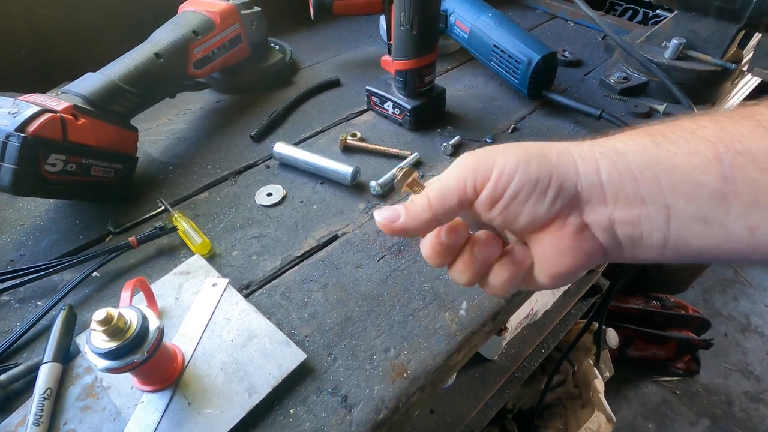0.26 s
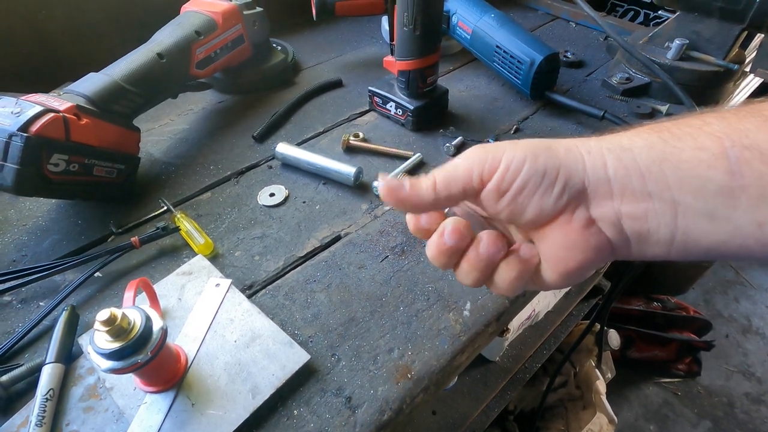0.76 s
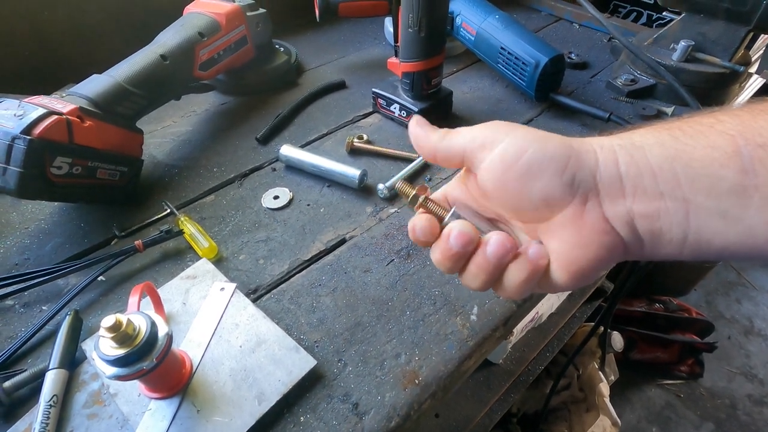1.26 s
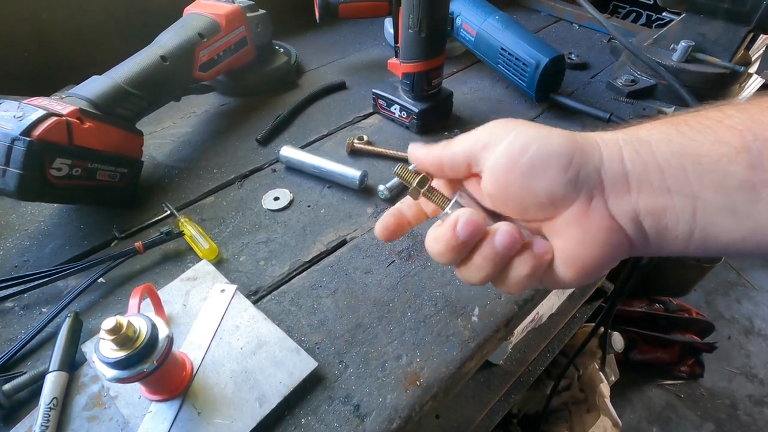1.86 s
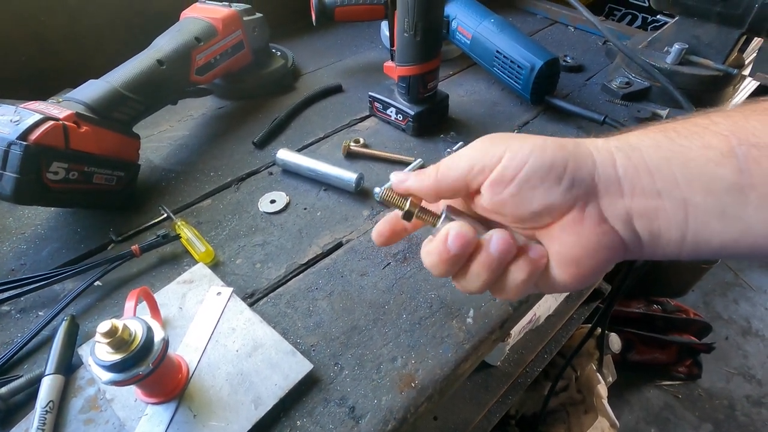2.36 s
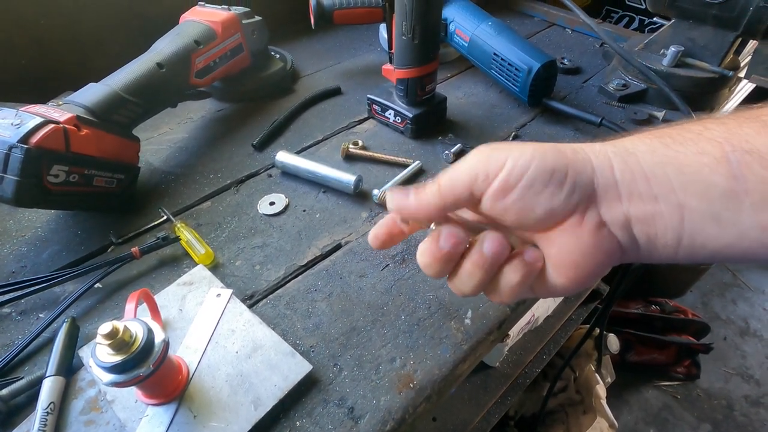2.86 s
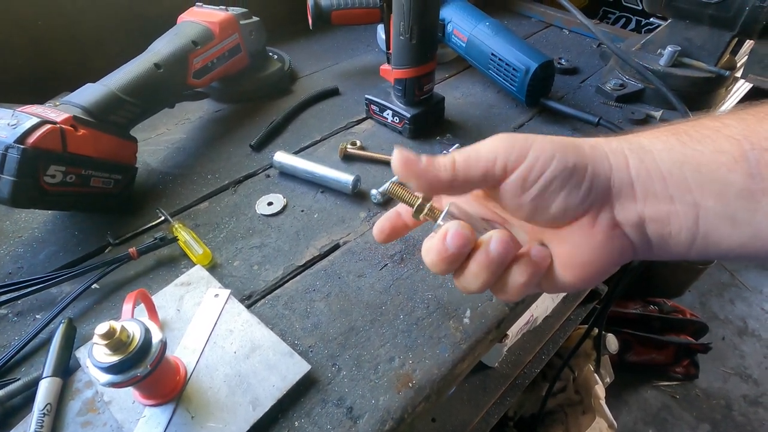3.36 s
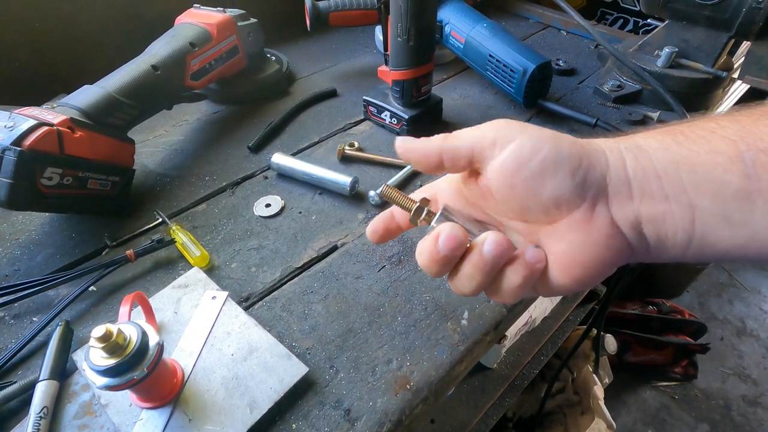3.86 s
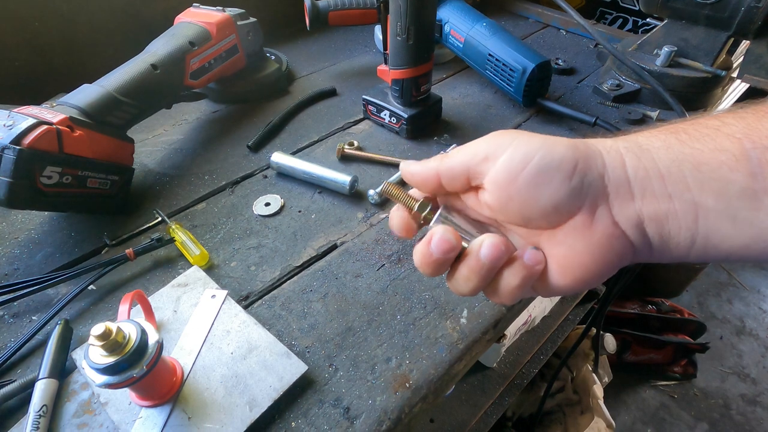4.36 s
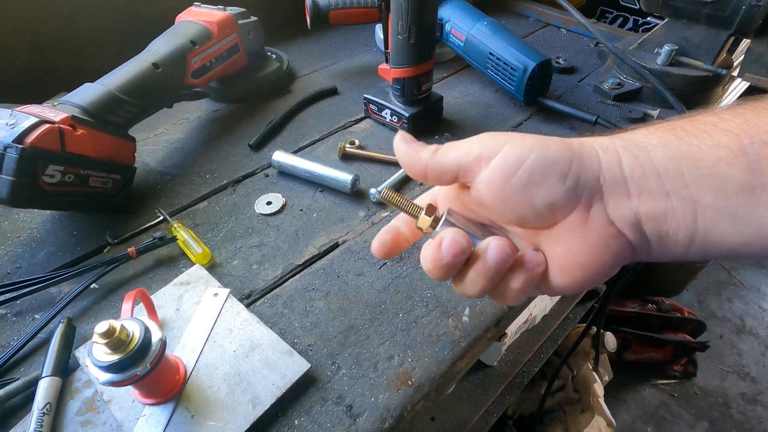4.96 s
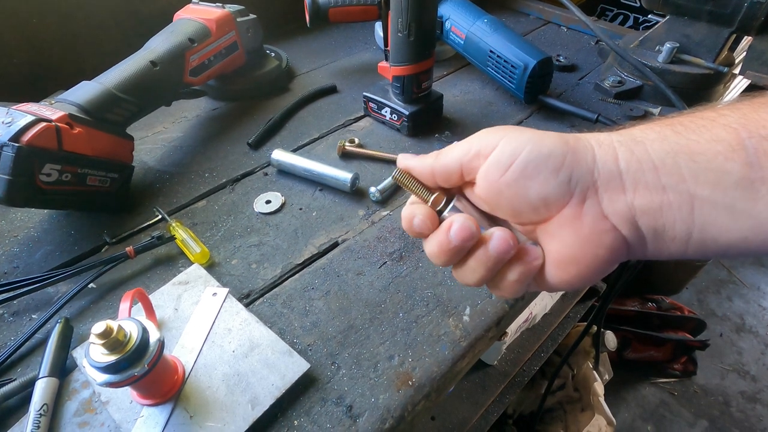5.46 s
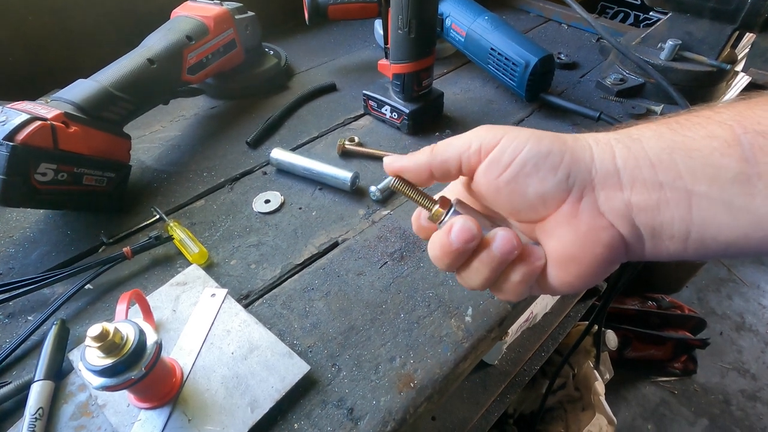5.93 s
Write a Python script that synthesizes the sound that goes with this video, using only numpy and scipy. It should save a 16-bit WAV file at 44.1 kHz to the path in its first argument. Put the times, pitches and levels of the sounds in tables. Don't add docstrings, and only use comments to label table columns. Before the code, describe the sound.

Small bright metal ticks come in irregular bursts as fingers spin a nut along a loose bolt. The first rings freely, later ones are drier and more damped, mixed with soft finger hiss and dull taps. The hand is close to the stereo microphone, with a short shop tail. Beneath lie deep distant traffic, faint tyre roar, a passing exhaust note and a few quiet bird peeps.

```python
import sys
import numpy as np
from scipy import signal
from scipy.fft import rfft, irfft, next_fast_len
from scipy.io import wavfile
from scipy.ndimage import uniform_filter1d, map_coordinates

SR = 44100
rng = np.random.default_rng(int(sys.argv[2]) if len(sys.argv) > 2 else 0)


def makeup_ratio(level_db):
    decades = np.asarray(level_db, float) / 20
    return 10 ** decades


def dump(signal):
    limited = np.clip(np.atleast_2d(signal).T, -1, 1)
    pcm = np.round(limited * 32767).astype(np.int16)
    wavfile.write(sys.argv[1], SR, pcm)


N = 273137

# (time [s], t60 of the low ring [s], t60 of the high ring [s], bolt knock over the click [dB])
FREEDOM = [(0, 0.51, 0.37, 0.5), (.3, 0.18, 0.074, -6), (.4, 0.21, .09, -8), (.75, 0.4, 0.11, -3),
           (.8, 0.58, 0.65, -9), (.95, 0.083, 0.31, -8), (1.3, 0.26, 0.087, -12),
           (1.6, 0.015, 0.084, -20.5), (2.1, 0.07, 0.06, -15), (3.8, 0.069, .08, -11),
           (4.6, 0.059, 0.06, -2.5), (4.8, 0.027, 0.045, -4), (6.2, 0.043, 0.083, 0)]
# (time of full rattle [s], length [s], force [dB])
FLICKS = [(0.303, 0.03, -45.5), (0.733, 0.026, -41), (1.139, 0.021, -44), (1.62, 0.047, -47),
          (2.061, 0.062, -39), (2.497, 0.029, -38.5), (2.927, 0.048, -42.5), (3.349, 0.072, -42.5),
          (3.791, 0.035, -57), (3.733, 0.014, -48), (4.139, 0.03, -45), (4.873, 0.07, -58),
          (5.236, 0.027, -37), (5.591, 0.01, -57), (6.022, 0.019, -40.5)]
# (centre [Hz], width [Hz], level [dB])
STEEL = [(1200, 7100, -25.5), (3660, 1010, -1), (4240, 650, 4), (5230, 1370, -0.5), (6530, 1000, -0.5),
         (7490, 3600, -10.5)]
# (centre [Hz], width [Hz], level [dB])
SHINE = [(8800, 1200, -7.5), (11660, 650, 7.5)]
STEEL_TOP_HZ = 13240


def contacts():
    low_hz = [4340, 4475, 4190, 4600]
    high_hz = [11810, 12180, 11880, 12120]
    # (level [dB], share of the ring's t60)
    low_ring = [(3, 0.46), (-1.5, 0.95), (4, 0.049), (-3, 0.28)]
    high_ring = [(0.5, 0.55), (0, 0.55), (-16, 1), (-16, 1)]
    # (time [s], click level [dB])
    catches = [(1.147, -35.5), (5.237, -30.5), (0.266, -61), (1.626, -37), (.7729, -46.5), (0.7008, -63),
               (0.7334, -39), (0.8295, -42), (1.65, -29.5), (2.077, -31), (2.4921, -36.5), (2.922, -36),
               (2.943, -40.5), (4.1708, -47), (4.469, -50), (4.613, -32.5), (4.894, -51), (4.912, -39),
               (5.2253, -55), (5.249, -55), (5.507, -49), (5.619, -39), (5.631, -41), (5.6477, -28),
               (5.695, -52), (5.738, -54), (5.769, -49), (5.895, -58), (6.0103, -38), (6.0355, -29),
               (.2925, -54), (.786, -46), (.922, -52), (0.838, -51), (1.225, -45), (2.9255, -35),
               (2.944, -49), (3.457, -46.5), (3.481, -41), (3.768, -39), (3.814, -40.5), (3.828, -46),
               (3.941, -54), (4.1272, -46), (4.138, -44.5), (4.141, -54), (4.185, -60), (4.1953, -48),
               (4.45, -48), (4.6022, -44), (4.8528, -47), (4.879, -44), (4.897, -37), (5.251, -33),
               (5.312, -57), (5.512, -50), (5.668, -50), (5.816, -60), (5.949, -49), (6.067, -45)]

    times, click_db, knock_db, low_db, high_db, held = np.transpose(sorted(thread_contacts() + taps()))
    low_t60, high_t60, _ = curves(FREEDOM, times)
    held_t60 = 0.029
    low_t60 = np.where(held, np.minimum(low_t60, held_t60), low_t60)

    shine_db = .6 * click_db + 0.44 * high_db
    clicks = uneven(times, click_db + 8.5, 0.0004, .014, STEEL)
    clicks += bursts(times, shine_db + 0.5, 0.0003, 0.02, SHINE)

    small_s, small_db = np.hstack([chatter(count=7), np.transpose(catches) + [[0], [11]]])
    small = uneven(small_s, small_db, 0.00028, 0.0088, STEEL)
    small += bursts(small_s, 1.9 * small_db - 0.5, 0.0004, 0.0031, SHINE)

    small_knock_db = small_db + curves(FREEDOM, small_s)[2] + 1.5
    knocks = knocking(np.r_[times, small_s], np.r_[knock_db + 18, small_knock_db])

    settled = times + .0006
    low_level = carried(times, low_db, low_t60) - 1.2
    high_level = carried(times, high_db, high_t60) - 2.5
    low = ringing(settled, low_level, low_t60, low_hz, low_ring, detune=.007, size=50, purer_db=12.5)
    high = ringing(settled, high_level, high_t60, high_hz, high_ring, detune=.001, size=60, purer_db=0)
    return filtered(clicks + knocks + small + low + high, lambda hz: 1 / (1 + (hz / STEEL_TOP_HZ) ** 34))


def thread_contacts():
    # (time [s], click level [dB], low ring level [dB], high ring level [dB])
    blows = [(.001, -49, -53, -59), (.3046, -31, -46, -37), (.3188, -49, -30.5, -23),
             (.3494, -33, -30.5, -28), (.741, -31, -31, -28.5), (1.1538, -39, -34, -45),
             (1.6402, -17, -18, -23), (1.6865, -26, -24, -37), (1.6909, -25, -25, -22),
             (2.0589, -36, -38, -35), (2.0806, -31, -44, -33), (2.0944, -28, -31, -16.5),
             (2.1143, -31, -35, -48), (2.5057, -20, -43, -18), (2.5096, -18.5, -51, -19),
             (2.5215, -30, -45, -22), (2.5289, -51, -38.5, -30.5), (2.9512, -24, -56.5, -24),
             (2.9569, -32, -45, -17), (2.9986, -28, -36.5, -27), (3.0034, -48, -48, -28),
             (3.4066, -31, -28.5, -23.5), (3.7545, -17.5, -30, -22.5), (3.763, -53.5, -56, -36),
             (3.8008, -28, -37, -26.5), (4.6076, -31.5, -26, -36), (4.9427, -25.5, -24.5, -20),
             (5.2333, -26, -23.5, -46), (6.0198, -33, -32, -44), (6.0253, -25, -24.5, -36)]
    # (time [s], click level [dB], high ring level [dB])
    jolts = [(0.3328, -27, -31), (0.375, -36.5, -34), (0.761, -42, -50), (1.1388, -34, -51),
             (1.1768, -42, -42), (1.2004, -36, -51), (1.6209, -36.5, -45.5), (2.0689, -28, -37),
             (2.0873, -32.5, -26), (2.4847, -33.5, -42), (2.5508, -25.5, -30), (2.932, -34.5, -39),
             (2.983, -41.5, -52), (3.3439, -34.5, -57.5), (3.3636, -28, -26), (3.4516, -38.5, -42.5),
             (3.736, -42.5, -35), (3.797, -29.5, -29), (3.791, -27, -25), (4.1534, -34, -49.5),
             (4.1582, -35.5, -40.5), (4.4542, -36.5, -46), (4.888, -32, -41.5), (5.2375, -26, -28.5),
             (5.2555, -37, -39), (5.5978, -30.5, -53), (5.6195, -31.5, -36), (5.6378, -25, -42),
             (5.6544, -32, -34.5), (6.0412, -33, -46), (0.3144, -34, -38), (0.7476, -40, -34),
             (0.7768, -34, -43), (1.1487, -30, -30.5), (1.635, -39.5, -51), (1.67, -48, -57.5),
             (1.6802, -40, -55), (2.0643, -35, -26), (2.091, -29, -33), (2.121, -46.5, -26.5),
             (2.129, -52, -39.5), (2.501, -38, -36.5), (2.547, -42.5, -50), (2.9456, -32, -34.5),
             (2.9601, -25.5, -22), (3.348, -41, -38), (3.3884, -50, -50), (3.4005, -38, -44.5),
             (3.731, -43.5, -49.5), (3.785, -41, -36.5), (3.806, -23, -27.5), (3.82, -41, -41),
             (4.1707, -57, -47.5), (4.4649, -40, -55), (4.9471, -35, -45), (4.953, -38.5, -33.5),
             (5.52, -46, -57), (5.612, -30, -43), (6.032, -30, -35), (6.0363, -34, -38)]
    # (time [s], click level [dB], low ring level [dB])
    ticks = [(0.794, -44, -47.5), (0.821, -46, -49.5), (1.186, -40, -46), (1.6682, -48, -53),
             (2.794, -54.5, -70), (2.8445, -42, -66), (3.2266, -55, -73), (3.26, -52, -72),
             (3.268, -50, -73), (3.4342, -45, -54), (3.4656, -42, -44), (3.4824, -52.5, -55),
             (4.025, -56, -61), (4.076, -50.5, -72), (4.568, -52, -49.5), (4.8317, -44.5, -38.5),
             (4.8748, -45, -52.5), (4.918, -38, -29.5), (5.113, -53, -45.5), (5.1614, -44, -45),
             (5.196, -49, -52), (5.21, -39, -44), (5.269, -36, -55), (5.7544, -53, -53), (5.93, -49, -41),
             (5.9406, -45, -41), (5.9733, -39.5, -40), (6.0659, -47, -57)]
    jolt_ring_db, tick_shine_db = -6.5, -22.5

    thread = list(blows)
    thread += [(s, db, db + jolt_ring_db, high) for s, db, high in jolts]
    thread += [(s, db, low, db + tick_shine_db) for s, db, low in ticks]
    return [(s, db, db + curves(FREEDOM, s)[2], low, high, False) for s, db, low, high in thread]


def taps():
    # (time [s], bolt knock level [dB], low ring level [dB])
    pushes = [(0.199, -45.5, -73), (0.2149, -27, -48), (0.3, -25.5, -52), (0.622, -52.5, -66),
              (0.64, -25.5, -70), (0.7278, -26.5, -60), (1.0487, -29.5, -33.5), (1.133, -26.5, -52),
              (1.332, -25, -38.5), (1.939, -47.5, -55.5), (2.3603, -43, -56.5), (4.801, -43.5, -41),
              (4.809, -34.5, -31), (4.8438, -39, -47.5), (4.965, -36, -36), (5.137, -42, -54),
              (5.2849, -34, -35.5), (5.348, -51, -56), (5.3725, -46, -58), (5.4132, -44, -49),
              (5.43, -42, -45), (5.467, -38, -37.5), (5.477, -35, -35), (5.5196, -32, -28.5),
              (5.5442, -30, -39), (5.727, -42, -46), (5.801, -38.5, -52.5), (5.807, -43, -36),
              (6.0924, -34.5, -44), (6.13, -47, -57), (0.304, -23, -60), (0.333, -30, -60),
              (0.3464, -19.5, -59), (0.7246, -27, -68.5), (0.7328, -31, -70), (0.764, -35, -50),
              (0.771, -26, -40), (2.04, -41.5, -68), (1.6209, -36.5, -57.5), (1.666, -42, -44),
              (.29, -38, -67), (.72, -46, -77), (1.129, -28, -71.5), (3.338, -47.5, -67.5),
              (5.63, -28, -48.5), (6.033, -41, -38)]
    click_db, shine_db = -14.5, -44.5
    firms_db_per_s = 0.5
    return [(s, db + click_db + firms_db_per_s * s, db, low, db + shine_db, True) for s, db, low in pushes]


def chatter(count):
    start, length, force_db = np.transpose(FLICKS)[:, :, None]
    spin_down_s = 0.0094
    luck = rng.random((len(FLICKS), count, 2))
    late = (np.arange(count) + luck[..., 0]) / count
    size_db = force_db + 6 - 5 * np.log(luck[..., 1] + .02) - 8 * late
    return (start + late * (length + spin_down_s)).ravel(), size_db.ravel()


def knocking(times, level_db):
    # (centre [Hz], width [Hz], level of each pass [dB])
    long_bolt = [(1639.4, 880, -8.5), (1977, 520, -1.5), (2614, 330, 0), (5990, 550, -9.5)]
    # (centre [Hz], width [Hz], level of each pass [dB])
    short_bolt = [(2460, 290, -1), (3306, 1780, -7.5)]
    regrip_s = 4.7
    early = times < regrip_s
    before = bursts(times[early], level_db[early], 0.0005, 0.012, long_bolt, order=2)
    after = bursts(times[~early], level_db[~early], 0.0005, 0.012, short_bolt, order=2)
    return before + after


def carried(times, level_db, t60):
    dent_db = 4.5
    out = list(level_db[:1])
    for k in range(1, len(times)):
        faded_db = out[-1] - 60 * (times[k] - times[k - 1]) / t60[k - 1]
        out.append(max(level_db[k], faded_db - dent_db))
    return np.array(out)


def ringing(times, level_db, t60, mode_hz, modes, detune, size, purer_db):
    t = np.arange(N) / SR
    last = np.clip(np.searchsorted(times, t) - 1, 0, None)
    grip = np.clip(0.077 / np.maximum(t60, .004), 0, 1)
    free = 1 - grip[last]
    luck = rng.standard_normal((len(times), len(modes), 3))
    out = np.zeros(N)
    for k, (hz, (db, share)) in enumerate(zip(mode_hz, modes)):
        fade_db = -60 * (t - times[last]) / np.maximum(share * t60[last], .004)
        rough_db = 1.2 * luck[last, k, 0] + (1.5 * hz / 12000 + 1.5 * grip[last]) * wobble(120)
        side_db = (k > 0) * purer_db * free
        jump = np.exp(1.5j * np.cumsum(grip * luck[:, k, 1]))[last]
        swing = makeup_ratio(level_db[last] + db - side_db + fade_db + rough_db) * jump
        soft = uniform_filter1d(swing.real, size) + 1j * uniform_filter1d(swing.imag, size)
        pitch = hz * (1 + detune * (grip ** 2 * luck[:, k, 2])[last])
        scuff = .6 * (1 + 1.8 * free) * (hz / 12000) ** 1.5 * wobble(150)
        out += (soft * np.exp(2j * np.pi * np.cumsum(pitch) / SR + 1j * scuff)).real
    return out


def uneven(times, level_db, rise, t60, colour):
    uneven_db = 3.5
    dull_hz = 8360
    luck = rng.standard_normal((len(times), 3))
    mixed = np.zeros(N)
    for k, group in enumerate(np.array_split(np.array(colour), 3)):
        mixed += bursts(times, level_db + uneven_db * luck[:, k], rise, t60, group)
    return filtered(mixed, lambda hz: 1 / (1 + 1.2j * hz / dull_hz - (hz / dull_hz) ** 2) ** 2)


def bursts(times, level_db, rise, t60, colour, order=1):
    t = np.arange(SR // 30) / SR
    hits = np.bincount(np.round(times * SR).astype(int), makeup_ratio(level_db), N)
    shape = (1 - np.exp(-t / rise)) * makeup_ratio(-60 * t / t60)
    noise = signal.oaconvolve(hits, shape)[:N] * np.sign(rng.standard_normal(N))
    return filtered(noise, lambda hz: peaks(colour)(hz) ** order)


def snaps():
    # (time [s], peak level [dB])
    crests = [(0.3033, -15.5), (0.3194, -25), (0.3316, -19), (0.3495, -9), (0.6399, -26.5), (0.7327, -26),
              (0.7404, -21), (0.7478, -18), (1.135, -29), (1.1508, -18.5), (1.333, -30.5), (1.6396, -7),
              (1.69, -12.5), (1.695, -9), (2.0588, -22), (2.0657, -24), (2.0764, -25), (2.0804, -21.5),
              (2.096, -24), (2.485, -24), (2.5052, -12), (2.5106, -19), (2.515, -16), (2.551, -21.5),
              (2.8462, -28), (2.9238, -20), (2.9512, -26), (2.9555, -15), (2.962, -21), (2.997, -27),
              (3.3444, -32), (3.3649, -19.5), (3.4057, -21), (3.7365, -19.5), (3.7569, -13), (3.7984, -29),
              (3.8007, -25), (4.1574, -36), (4.4528, -24), (4.6074, -12.5), (4.811, -30), (4.888, -24),
              (4.9198, -24), (4.9437, -10), (5.1118, -41), (5.161, -42.5), (5.2378, -15), (5.469, -30),
              (5.5209, -32), (5.5444, -21), (5.5987, -20), (5.6366, -23), (5.8066, -37), (5.9723, -21),
              (6.0118, -27), (6.0255, -22), (6.0255, -13), (6.037, -11), (6.0414, -28), (6.0647, -32)]
    times, peak_db = np.transpose(crests)
    colour = STEEL + [(hz, width, db - 14.5) for hz, width, db in SHINE]
    cracks = bursts(times, peak_db + 1.5, .0001, 0.0036, colour)
    return filtered(cracks, lambda hz: 1 / (1 + (hz / STEEL_TOP_HZ) ** 30))


def rubbing():
    # (frequency [Hz], density [dB per Hz])
    skin_colour = [(900, -44.5), (2000, -5), (3500, -2.5), (6500, -8), (9000, -23.5), (12000, -9.5),
                   (13200, -24.5), (15700, -59.5)]
    # (frequency [Hz], density [dB per Hz])
    whisper = [(2000, -44), (4000, 4.5), (7000, -7.5), (10000, -11.5), (12000, -3), (13000, -21.5),
               (14000, -54)]
    # (start time [s], end time [s], hiss level [dB])
    finger_shifts = [(0, 0.248, -70.5), (0.624, 0.695, -69.5), (1.032, 1.103, -72), (1.3, 1.323, -77),
                     (1.366, 1.398, -69.5), (1.931, 1.993, -74), (2.339, 2.409, -76), (2.769, 2.901, -72.5),
                     (3.015, 3.304, -75), (3.588, 3.69, -78.5), (4.013, 4.1, -76), (4.445, 4.623, -71),
                     (4.646, 4.757, -78), (4.774, 4.994, -66), (5.008, 5.09, -76), (5.109, 5.904, -69),
                     (5.927, 6.19, -73.5)]
    drag_s = .045
    t = np.arange(N) / SR

    def swell(times, levels_db):
        return makeup_ratio(np.interp(t, times, levels_db, left=-150, right=-150))

    def grit(depth_db):
        return rng.standard_normal(N) * makeup_ratio(depth_db * wobble(500) + 7.4 * wobble(55))

    drag, rattle, shifts = np.zeros((3, N))
    for s, length, db in FLICKS:
        drag += swell([s - drag_s, s - .004, s + 0.086], [db - 42, db - 2.0, db - 39.0])
        end = s + length
        rattle += swell([s - .015, s, end, end + .045], [db - 30, db - 6, db - 10, db - 38])
    for a, b, db in finger_shifts:
        shifts += swell([a - .03, a, b, b + 0.028], [db - 35.0, db, db + 0.5, db - 17.0])

    skin = unit(filtered(grit(1.3), lambda hz: makeup_ratio(along(skin_colour, hz))))
    fingers = unit(filtered(grit(1.3), lambda hz: makeup_ratio(along(whisper, hz))))
    rasp = peaks(STEEL + [(hz, width, db - 25.5) for hz, width, db in SHINE])
    threads = unit(filtered(grit(5), lambda hz: rasp(hz) / (1 + (hz / STEEL_TOP_HZ) ** 24)))
    return drag * skin + rattle * threads + shifts * makeup_ratio(2.2 * wobble(25)) * fingers


def shop(x):
    # (frequency [Hz], t60 [s])
    decay = [(500, 0.14), (2500, 0.26), (5000, 0.2), (9000, 0.19), (12000, 0.17)]
    hz, t, z = signal.stft(rng.standard_normal((2, SR // 2)), SR, nperseg=256)
    fading = z * makeup_ratio(-60 * t / along(decay, hz)[:, None])
    a, b = signal.istft(fading, SR, nperseg=256)[1]
    tail = np.array([a + 0.86 * b, a - 0.16 * b])
    tail /= np.linalg.norm(tail[0])
    late = np.pad(x, (200, 0))[None]
    return signal.fftconvolve(late, tail, axes=1)[:, :N]


def bird():
    # (time [s], length [s], start pitch [Hz], end pitch [Hz], level [dB])
    peeps = [
        (1.0, .05, 4850, 4700, -75),
        (4.065, .035, 6500, 6400, -77),
        (4.182, .015, 6200, 5700, -72),
        (4.232, .012, 4600, 5200, -74),
        (4.243, .03, 5280, 5100, -68),
        (4.309, .022, 4950, 4740, -64),
        (4.383, .012, 6400, 5500, -72),
        (4.392, .018, 5350, 5250, -67),
        (4.435, .015, 5150, 5000, -71),
    ]
    out = np.zeros(N)
    for s, length, from_hz, to_hz, db in peeps:
        u = np.arange(round(length * SR)) / (length * SR)
        pitch = from_hz + (to_hz - from_hz) * u
        tone = np.sin(2 * np.pi * np.cumsum(pitch) / SR)
        out[round(s * SR):][:len(u)] += makeup_ratio(db) * np.sin(np.pi * np.sqrt(u)) * tone
    return out * makeup_ratio(3 * wobble(200))


def traffic():
    # (time [s], rumble level [dB], drone level [dB], tyre roar level [dB])
    levels = [(0.0, -35, -42, -54.5), (1.2, -36.5, -44.5, -58.5), (2.0, -37.5, -44, -57),
              (2.8, -35.5, -44.5, -58.5), (3.67, -35, -47.5, -59), (4.3, -32, -49, -55.5),
              (4.55, -29, -46.5, -54), (4.75, -31, -44.5, -51), (5.15, -34, -48.5, -54.5),
              (5.9, -37.5, -46.5, -55), (6.19, -32, -47.5, -57)]
    # (time [s], level [dB])
    lorry = [
        (0, -61.5),
        (1.1, -61),
        (1.5, -64.5),
        (2.7, -57.5),
        (3.1, -49.5),
        (3.5, -70),
    ]
    # (frequency [Hz], density [dB per Hz])
    rumble = [(8.8, -47.5), (15, -16), (64, 5.5), (76, 1), (180, -24), (230, -54.5), (400, -120)]
    drone = [(71, -29.5), (120, -1), (177, -11), (227, -7.5), (275, -15.5), (750, -29), (980, -49),
             (1650, -120)]
    tyres = [(380, -2), (650, -4), (840, -2), (948, 3), (1110, 2.5), (1190, -2), (1300, 2), (2400, -16.5),
             (3120, -19.5), (5280, -120)]
    air = [(1500, -17.5), (2000, -0.5), (2600, -24), (4000, -10), (6500, -13), (8000, -19.5), (9500, -53.5),
           (14000, -85.5)]
    rumble_db, drone_db, roar_db = curves(levels)
    low = makeup_ratio(rumble_db) * rush(rumble, patchy_db=1.5) + makeup_ratio(drone_db) * rush(drone, patchy_db=1.66)
    exhaust = unit(filtered(rng.standard_normal(N), peaks([(357.3, 25, 0)])))
    note = makeup_ratio(curves(lorry)[0]) * exhaust
    roar = makeup_ratio(roar_db + 1.5) * rush(tyres, patchy_db=1.5)
    return low + note + roar + makeup_ratio(-72.5) * rush(air, patchy_db=1.5)


def rush(spectrum, patchy_db):
    # (frequency [Hz], left-right likeness)
    alike = [(60, 1.0), (150, 1), (360, 0.91), (890, 0.74), (2170, 0.55), (5330, 0.62), (13100, 0.72)]
    z = signal.stft(rng.standard_normal((2, N + 512)), nperseg=512)[2]
    field = uniform_filter1d(uniform_filter1d(rng.standard_normal(z.shape[1:]), 4, 0), 20, 1)
    pair = signal.istft(z * makeup_ratio(patchy_db * unit(field)), nperseg=512)[1][:, :N]

    def spread(hz):
        turn = np.arccos(np.clip(along(alike, hz), -1, .998)) / 2
        return makeup_ratio(along(spectrum, hz)) * [np.cos(turn), np.sin(turn)]

    mid, side = filtered(pair, spread)
    return unit(np.array([mid + side, mid - side]))


def unit(x):
    return x / np.sqrt(np.mean(x ** 2) + 1e-20)


def along(points, hz):
    f, v = np.transpose(points)
    return np.interp(np.log(hz + 1), np.log(f + 1), v)


def curves(rows, s=None):
    t, *cols = np.transpose(rows)
    return [np.interp(np.arange(N) / SR if s is None else s, t, c) for c in cols]


def wobble(rate):
    knots = rng.standard_normal(int(N * rate / SR) + 4)
    return map_coordinates(knots, [np.arange(N) * rate / SR])


def filtered(x, response):
    m = next_fast_len(N + SR // 2)
    return irfft(rfft(x, m) * response(np.fft.rfftfreq(m, 1 / SR)), m)[..., :N]


def peaks(modes):
    def response(f):
        total = 0
        for k, (c, w, db) in enumerate(modes):
            total = total + (-1) ** k * makeup_ratio(db) * 1j * f * w / (c * c - f * f + 1j * f * w)
        return total
    return response


def scene():
    # (frequency [Hz], left over right [dB])
    lean = [(900, -1.5), (2000, -2), (6000, -3.5), (9000, -0.5), (11000, 2.5), (12000, 3.5), (13000, 3.5)]
    # (frequency [Hz], left leads by [rad])
    lead = [(1000, -0.18), (2200, -0.8), (3500, -0.76), (5500, 0.15), (8700, 0.59)]
    sides = np.array([[.5], [-.5]])
    nut = contacts() + rubbing() + snaps()
    near = filtered(nut, lambda hz: makeup_ratio(sides * along(lean, hz)) * np.exp(1j * sides * along(lead, hz)))
    peeps = bird()
    far = shop(peeps * makeup_ratio(6 * wobble(300)))
    lag_s = .00002

    def street_side(hz):
        return makeup_ratio(sides * -.4) * np.exp(-2j * np.pi * hz * sides * lag_s)

    street = filtered(traffic(), street_side)
    return near + makeup_ratio(-15.5) * shop(nut) + peeps + makeup_ratio(-4) * far + street


def low_pass(x):
    return signal.sosfilt(signal.butter(12, 15700, fs=SR, output="sos"), x)


def record(dry):
    soft = filtered(dry, lambda hz: 1 / (1 + (hz / 14500) ** 10))
    return low_pass(soft)


dry = scene()
out = record(dry)
dump(out)
```